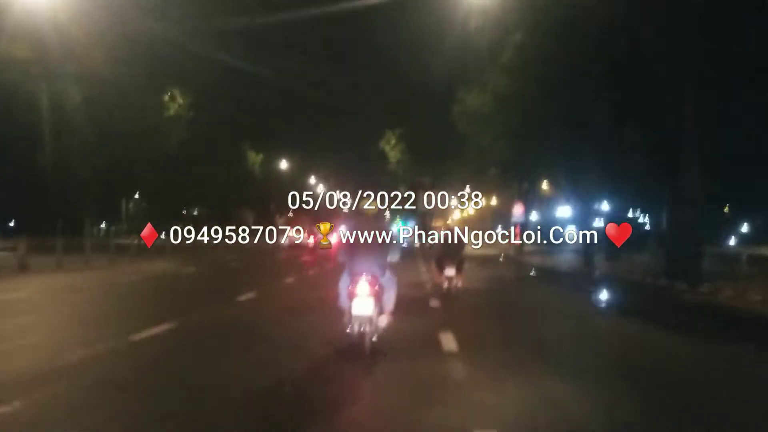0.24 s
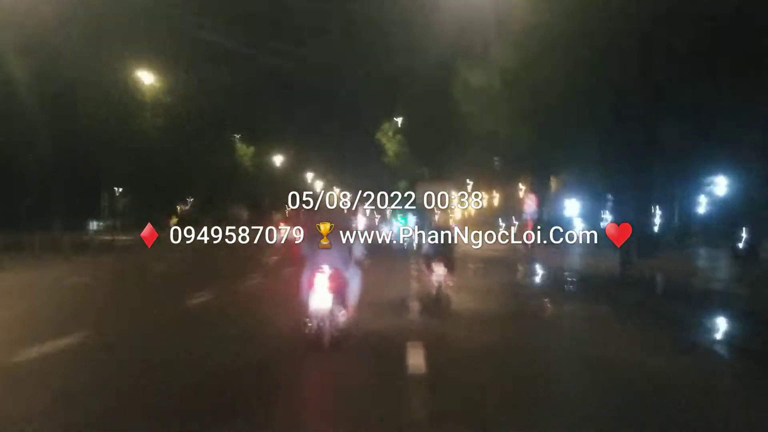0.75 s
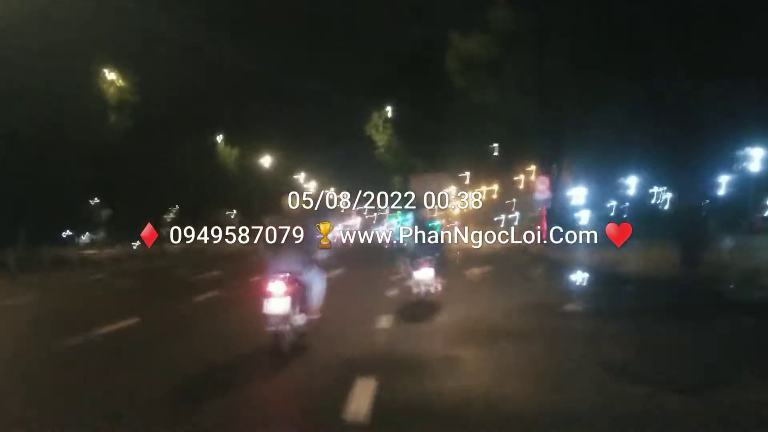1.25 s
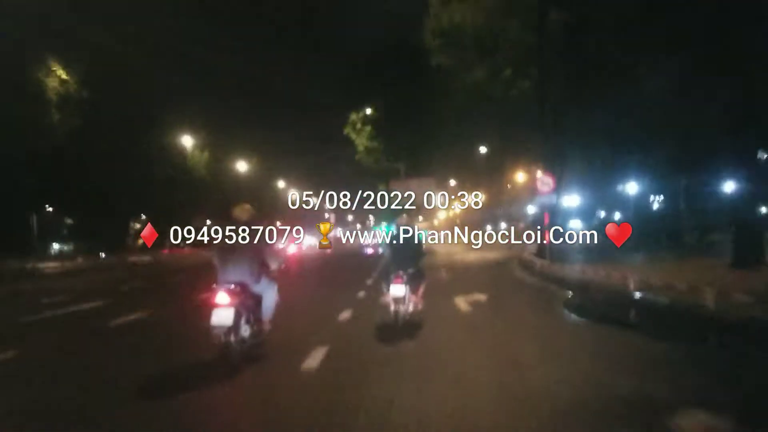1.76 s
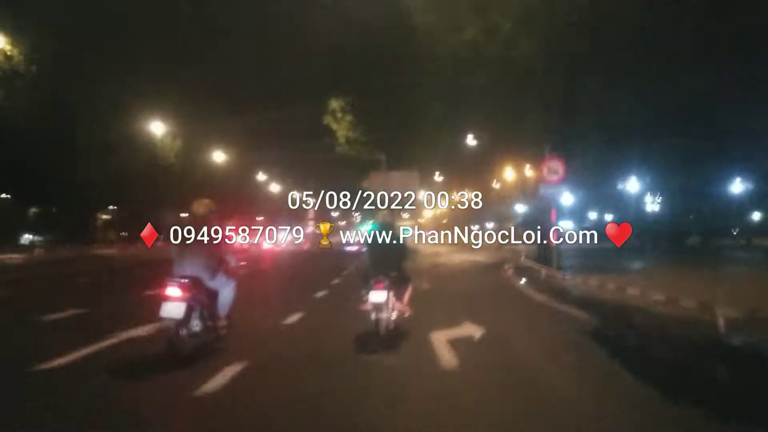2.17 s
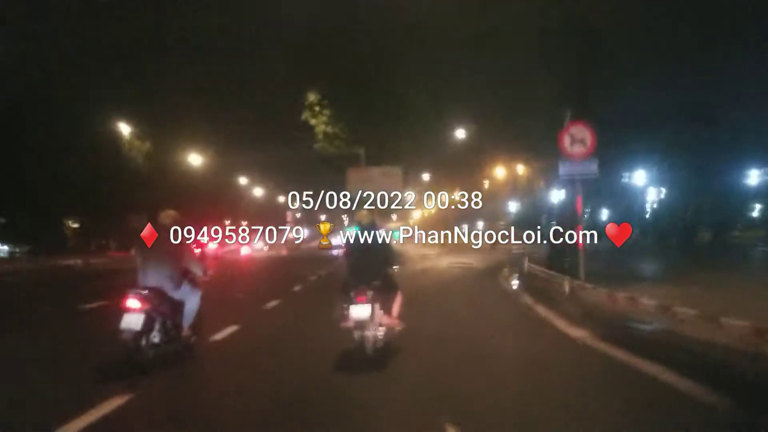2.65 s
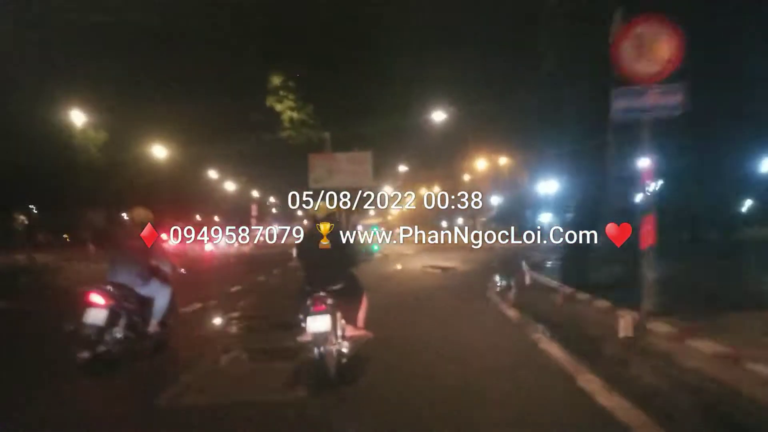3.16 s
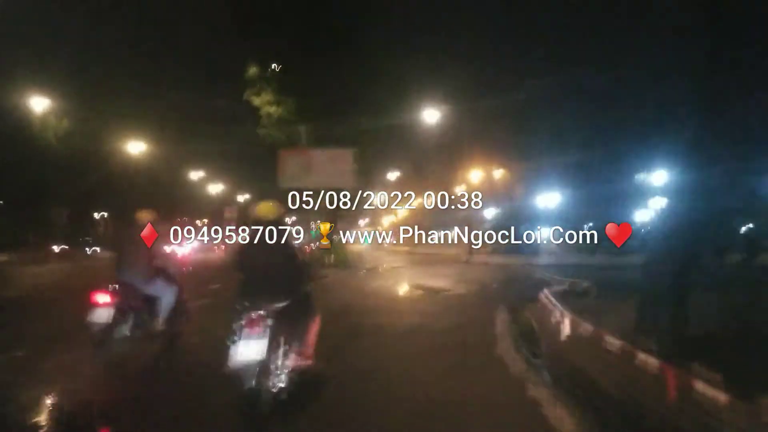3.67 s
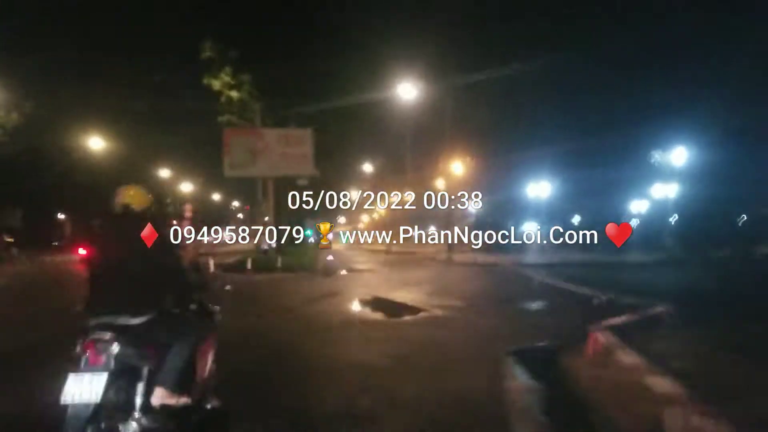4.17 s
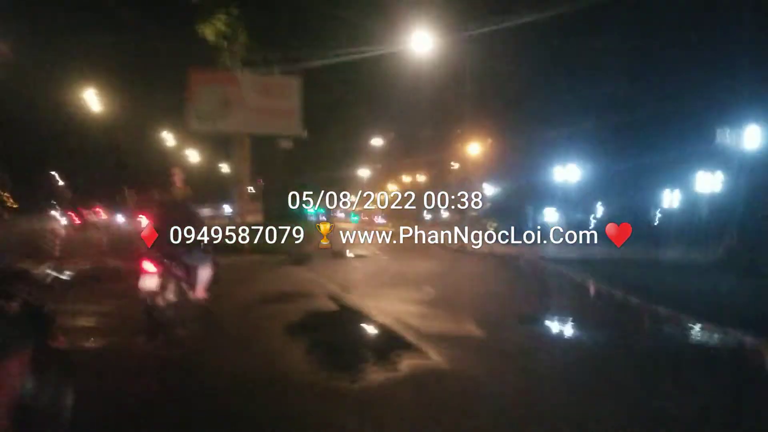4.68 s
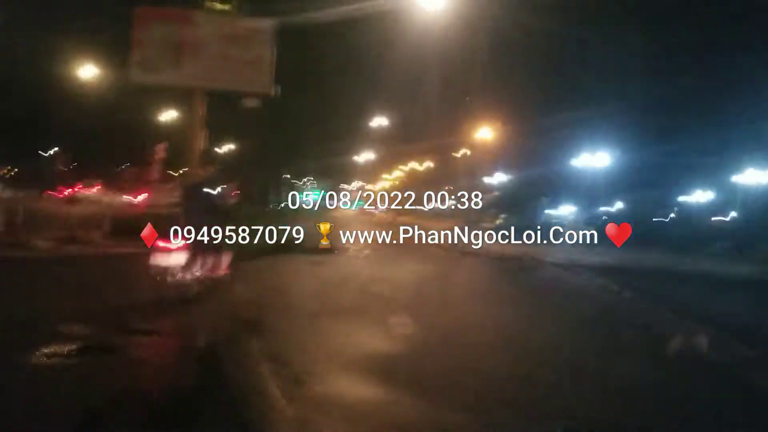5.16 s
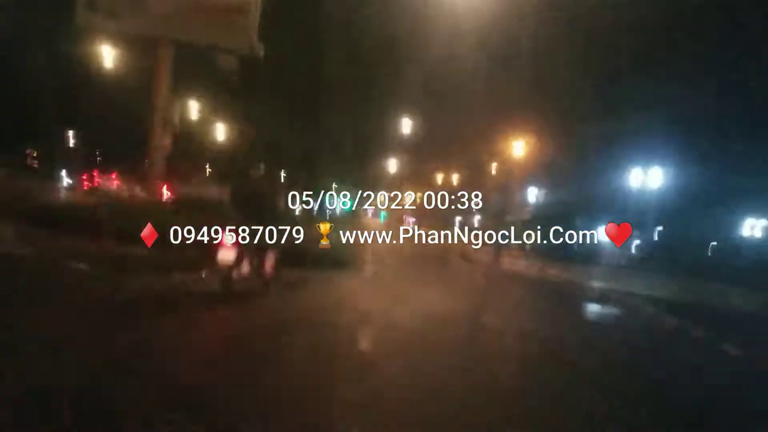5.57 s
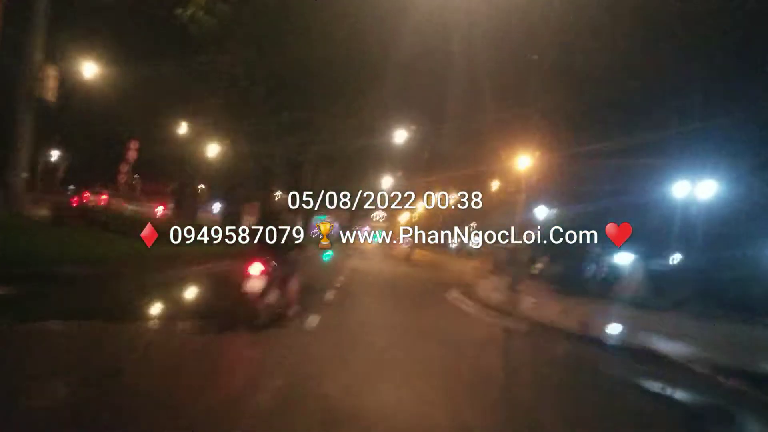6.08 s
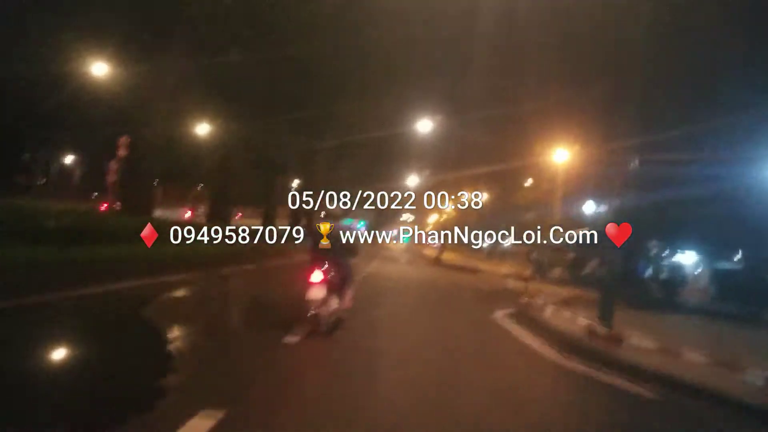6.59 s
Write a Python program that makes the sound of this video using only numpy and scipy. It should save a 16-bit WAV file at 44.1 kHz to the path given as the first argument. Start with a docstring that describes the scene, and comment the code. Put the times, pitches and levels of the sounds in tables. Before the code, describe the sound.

A small motorbike hums at a nearly constant speed throughout, heard from a microphone in a loose holder on the bike. Low wind flutters on the microphone, and the tyres rumble and softly hiss on the wet street. The plastic holder ticks rapidly from the start, with sharper, irregular knocks joining from about 1 second. The engine's drone swells and dips between roughly 1 and 3 seconds. From about 2.8 to 4.7 seconds, several bumps give dull thuds, strongest around 4 seconds, and the wind buffets more deeply from 3.5 seconds. At about 5.3 seconds the bike hits a pothole: a deep thud, a burst of hard plastic clatter and a few tiny rubber squeaks. From about 5.9 seconds the ride is noticeably quieter, with softer engine, wind and ticking, and one light bump near 6.6 seconds.

```python
"""Plastic chatter over the hum of a small motorbike, heard from a camera in a loose holder on the bike.
The single cylinder shakes the frame, wind buffets the two microphone ports, and the tyres rumble and
hiss along a wet city street at night. The holder's jaws tick and its body knocks against a stop.
At about 5.3 s the bike thuds through a pothole: the holder clacks hard, its rubber grips squeak,
and the ride goes on more quietly."""
import sys
import numpy as np
from scipy.fft import rfft, irfft, next_fast_len
from scipy.io import wavfile
from scipy.ndimage import map_coordinates

SR = 44100
rng = np.random.default_rng(int(sys.argv[2]) if len(sys.argv) > 2 else 0)


def unload_audio(sound):
    """Save the sound as a 16-bit wav file, at the path given as the first command line argument."""
    columns = np.transpose(np.atleast_2d(sound))
    # keep every value between -1 and 1, then stretch to whole-number steps
    steps = np.round(np.clip(columns, -1, 1) * 32767)
    wavfile.write(sys.argv[1], SR, steps.astype(np.int16))


N = 301203

# The bed, which drops after the pothole. Each row: time in seconds, wind in dB, road rumble in dB.
RIDE_LEVELS = [(0, -23.5, -22), (3.3, -25, -21.5), (4.2, -25, -21.5), (5.38, -22, -21), (5.9, -32.5, -28.5),
               (6.83, -31, -26.5)]
# Patches of broken asphalt. Each row: centre in seconds, half length in seconds, extra shake in dB.
ROUGH_PATCHES = [(0.593, 0.14, 0.9), (1.404, 0.2, 3), (2.416, 0.08, 1.6), (2.853, 0.076, 2),
                 (4.012, 0.086, 1.4), (4.718, 0.044, 2.9)]
# Tone of the wind, the road rumble, the tyre hiss and the spray. Each row: frequency in Hz, gain in dB.
WIND_EQ = [(15, -29), (28, -29), (45, -1), (60, -5.5), (90, -2.5), (125, -5.5), (170, -6), (260, -11),
           (500, -72)]
ROAD_EQ = [(60, -35), (110, -7), (155, -0.5), (210, -6), (280, -1.5), (345, -7.5), (410, -7), (620, -11.5),
           (1020, -10.5), (1300, -18), (1700, -26), (3000, -61), (6000, -87)]
HISS_EQ = [(900, -10), (1600, -12.5), (1950, -0.5), (2250, 2), (2500, -1.5), (2850, -3), (3200, -8),
           (3600, -13.5), (4100, -22.5), (5500, -29), (7200, -37), (8500, -56), (16000, -69)]
SPRAY_EQ = [(2500, -23), (3650, 2.5), (4200, -9), (5400, -7.5), (7200, -21.5), (8500, -33), (10800, -16),
            (16000, -22)]
# Deeper buffeting on the way to the pothole: start in seconds, end in seconds, level in dB.
LOW_GUST = (3.55, 5.3, -26.5)
# Fader for the tyre hiss. Each row: time in seconds, level in dB.
HISS_LEVELS = [(0, -42.5), (.45, -38.5), (.65, -36.5), (1.1, -37.5), (1.85, -37.5), (2.1, -37.5),
               (2.3, -33), (3.55, -36), (4.75, -33.5), (5.3, -36), (5.85, -42), (6.83, -38.5)]
# Engine speed. Each row: time in seconds, crank turns per second.
CRANK_SPEED = [(0, 68.5), (.6, 68.4), (1.7, 66.4), (2.4, 67.6), (2.8, 66.1), (3.3, 67.3), (5.2, 67.5),
               (5.9, 69), (6.83, 70.5)]
# Faders for the once-a-turn hum and the surging twice-a-turn drone. Each row: time in seconds, level in dB.
HUM_LEVELS = [(0, -28), (1.7, -33), (2.9, -30), (3.3, -33.5), (5, -26.5), (5.85, -33), (6.83, -35)]
DRONE_LEVELS = [(0, -34), (.9, -24), (1.25, -29.5), (1.45, -21.5), (1.78, -18.5), (1.88, -33),
                (2.05, -24.5), (2.21, -36.5), (2.33, -21), (2.48, -19), (2.61, -38), (2.8, -16.5),
                (3.1, -30.5), (3.6, -31.5), (4.9, -26), (5.9, -38.5), (6.83, -33.5)]
# Road bumps. Each row: start in seconds, level in dB, thud pitch in Hz, fairing boom over the thud in dB.
BUMPS = [(2.778, -17.5, 124, 0), (3.119, -7.5, 138, -8.5), (3.439, -8, 191, -11), (3.792, -12.5, 103, 1),
         (3.945, -4, 127, -14), (4.265, -3, 159, -13), (4.692, -16, 139, -19), (5.274, -1, 50.3, -6.5),
         (5.294, -5, 52, -5), (5.408, -4.5, 66, -20), (5.8, -17.5, 179, -2.5), (6.564, -16, 70, -16)]
# The camera slips in its grips. Each row: start in seconds, level in dB, centre pitch in Hz.
SQUEAKS = [(5.339, -16.5, 1360), (5.373, -20, 1030), (5.401, -22, 1200), (5.479, -22, 953),
           (5.533, -23.5, 826)]
# Loose parts jostle after the pothole: start in seconds, end in seconds, level in dB.
CLATTER = (5.33, 5.5, -32.5)
# The holder hits its stop. Each row: start in seconds, level in dB, ring pitch in Hz.
KNOCKS = [(1.092, -12, 980), (1.323, -6.5, 990), (1.336, -14, 1110), (1.377, -8.5, 834), (1.431, -9, 796),
          (1.445, -8, 835), (1.495, -12, 620), (1.551, -9.5, 554), (1.764, -17, 520), (2.015, -11, 970),
          (2.177, -17.5, 1020), (2.785, -9, 566), (2.835, -7.5, 885), (3.426, -12.5, 580),
          (3.808, -10.5, 576), (4.002, -10, 1050), (4.517, -10.5, 633), (4.606, -16.5, 880),
          (4.691, -9.5, 795), (4.884, -15.5, 511), (4.989, -22, 940), (5.324, -23, 900), (5.426, -13, 880),
          (5.453, -16, 850), (5.479, -8, 926), (5.611, -16, 930), (5.798, -13, 1030)]
# The jaws' single strikes on the camera, from hard clacks to light ticks. Each row: time in seconds, contact
# level in dB, ring pitch in Hz, ring level in dB.
JAW_STRIKES = [(.02, -30, 3650, -34), (0.079, -31.5, 2360, -29), (.137, -36, 3650, -35),
               (0.22, -34, 3630, -34), (0.245, -30.5, 5270, -40), (.279, -37, 3670, -29),
               (0.581, -36, 2800, -29), (.686, -34, 3650, -33), (.753, -37, 3650, -35),
               (0.817, -31, 3600, -34), (.92, -36, 3650, -35), (0.932, -33, 2740, -30),
               (.947, -34, 3650, -35), (1.091, -30, 3600, -30), (1.159, -42, 2780, -29),
               (1.212, -29.5, 3650, -41), (1.321, -32, 2780, -25), (1.444, -27, 3000, -32),
               (1.504, -33, 3620, -48), (1.53, -33, 3630, -38), (1.557, -26.5, 2730, -23),
               (1.582, -32, 3650, -40), (1.608, -29, 3600, -32), (1.645, -29.5, 3560, -39),
               (1.713, -35, 3620, -33.5), (1.766, -29.5, 2380, -35), (1.899, -35, 3600, -32),
               (1.948, -31.5, 2290, -30), (2.015, -28, 2270, -29), (2.068, -31.5, 2750, -39),
               (2.102, -31, 5300, -47), (2.12, -38, 3650, -33), (2.13, -35, 3650, -39),
               (2.178, -32, 2760, -30), (2.303, -30.5, 3620, -35), (2.354, -30, 3700, -29),
               (2.379, -28, 3660, -37), (2.404, -35, 3620, -30), (2.46, -30, 3650, -39),
               (2.716, -27, 2370, -25), (2.785, -40, 2300, -22), (2.835, -33.5, 2790, -25),
               (2.845, -28, 2310, -25), (2.859, -36, 3680, -38), (2.897, -34, 2280, -36),
               (2.921, -32.5, 3700, -45), (3.056, -37, 3650, -37), (3.09, -37, 3650, -40),
               (3.125, -29.5, 2250, -29), (3.147, -36, 3650, -42), (3.207, -33, 3650, -51),
               (3.246, -29, 2330, -23), (3.286, -35, 3650, -38), (3.371, -40, 3650, -44),
               (3.4, -35, 3650, -47), (3.582, -28.5, 3650, -37), (3.605, -36.5, 3650, -30),
               (3.712, -37, 3650, -32), (3.754, -34, 3680, -30), (3.831, -34, 3700, -44),
               (3.867, -29.5, 3700, -31), (3.955, -29, 3620, -33), (4.05, -35, 3650, -45),
               (4.069, -30.5, 3460, -34), (4.093, -30, 3700, -39), (4.112, -27.5, 3600, -31),
               (4.255, -36, 2310, -23), (4.269, -29, 3500, -29), (4.279, -31, 5800, -27),
               (4.515, -40, 2080, -28), (4.568, -31, 2300, -24), (4.586, -35, 6160, -32),
               (4.635, -35, 3340, -29), (4.659, -34, 3650, -44), (4.757, -27, 7060, -34),
               (4.766, -27, 2900, -22), (4.767, -35, 4800, -25), (4.841, -30.5, 3750, -43),
               (4.934, -33, 3650, -35), (4.948, -41, 6200, -35), (4.99, -31, 2290, -34),
               (5.04, -34, 3650, -42), (5.268, -35, 3650, -38), (5.293, -29, 4400, -31),
               (5.324, -24.5, 3420, -36), (5.364, -35, 2800, -31), (5.378, -21.5, 5830, -18.5),
               (5.426, -22, 2300, -12), (5.445, -43, 3670, -43), (5.479, -23, 2880, -18),
               (5.483, -25, 3420, -29), (5.523, -47, 6000, -42), (5.558, -32, 3230, -27.5),
               (5.619, -41, 2700, -24), (5.669, -38.5, 3650, -44), (5.799, -39, 2790, -30),
               (5.889, -38.5, 3700, -45), (6.15, -37, 3650, -35), (6.452, -42, 3650, -44),
               (6.574, -31, 5000, -34), (6.696, -41, 3680, -44)]
# Tone of a tick's contact. Each row: frequency in Hz, gain in dB.
TICK_EQ = [(300, -10), (1000, 34.5), (2500, 16), (3100, 6.5), (3650, 13.5), (4300, 2), (5400, 1),
           (6300, -3.5), (7100, -8), (8500, -15.5), (10800, -9), (13500, -16.5), (16000, -22.5)]
# The jaws' own thin ring, in every tick. Each row: pitch in Hz, level in dB.
JAW_MODES = [(2870, 8.5), (3620, -16.5), (5350, 1), (7100, 3)]
# The three resonances a light tick can ring, in Hz.
RATTLE_PITCHES = [2310, 2810, 3600]
# Stereo width of the noise layers. Each row: frequency in Hz, left-right correlation from -1 to 1.
PORT_LIKENESS = [(60, 0.5), (140, 0.82), (200, 0.22), (280, -0.17), (440, 0.5), (700, 0.28), (1000, 0.27),
                 (1600, -0.06), (1900, 0.77), (2400, 0.67), (3000, -0.33), (5000, 0), (15000, -0.27)]
# Each port has its own colour. Each row: frequency in Hz, left minus right in dB.
PORT_BALANCE = [(100, 0.5), (250, -1), (380, -5.5), (900, -6), (1200, -6.5), (1600, 3), (2300, -0.5),
                (2900, 6), (3600, 7.5), (4500, 1), (6000, 11), (7200, -9.5), (8300, 1), (11000, 4),
                (15000, -8)]

TIME = np.arange(N) / SR
STRIKE_S = .003  # a tick's lead-in before its strike


def amp(db):
    """Decibels to gain."""
    return 10 ** (np.asarray(db) / 20)


def along(points, hz):
    """Read (Hz, value) points on a log frequency axis."""
    freqs, values = np.transpose(points)
    return np.interp(np.log(hz + 1), np.log(freqs + 1), values)


def curves(rows):
    """Automation lanes: one value per sample for each column after the time."""
    times, *columns = np.transpose(rows)
    return [np.interp(TIME, times, column) for column in columns]


def wobble(rate):
    """A smooth random curve with rate knots a second."""
    knots = rng.standard_normal(int(N * rate / SR) + 4)
    return map_coordinates(knots, [TIME * rate])


def filtered(x, response):
    """Filter x by a gain given as a function of Hz."""
    size = x.shape[-1]
    padded = next_fast_len(size + size // 10)
    return irfft(rfft(x, padded) * response(np.fft.rfftfreq(padded, 1 / SR)), padded)[..., :size]


def stereo_noise(eq):
    """Shaped noise, partly alike at the two ports; its mid channel has rms 1."""
    def mid_side_gains(hz):
        width = np.arccos(np.clip(along(PORT_LIKENESS, hz), -1, 1)) / 2
        return amp(along(eq, hz)) * [np.cos(width), np.sin(width)]
    mid, side = filtered(rng.standard_normal((2, N)), mid_side_gains)
    return np.array([mid + side, mid - side]) / np.std(mid)


def add(track, s, sound):
    """Mix a short sound into a track at s seconds."""
    start = int(np.clip(round(s * SR), 0, N - 1))
    track[..., start:start + sound.shape[-1]] += sound[..., :N - start]


def blow(t, rise_s, decay_s):
    """Envelope of a contact: fast attack, exponential tail."""
    return (1 - np.exp(-t / rise_s)) * np.exp(-t / decay_s)


def shaking():
    """Wind and rumble levels in dB; both swell over broken asphalt, the wind more so."""
    wind_db, rumble_db = curves(RIDE_LEVELS)
    extra_db = sum(db * np.exp(-((TIME - s) / half) ** 2) for s, half, db in ROUGH_PATCHES)
    return wind_db + 1.6 * extra_db, rumble_db + extra_db


def wind(trim_db=1.5, flutter_db=0.95):
    """Air buffets the ports with a low, fluttering roar."""
    return amp(shaking()[0] + trim_db + flutter_db * wobble(22)) * stereo_noise(WIND_EQ)


def low_gust(fade_s=0.16):
    """For a while the wind thumps more deeply at the ports."""
    start, end, db = LOW_GUST
    fade = np.clip(np.minimum(TIME - start, end - TIME) / fade_s, 0, 1)
    return amp(db) * fade * stereo_noise([(20, -36), (45, 0), (75, -9), (130, -23), (300, -77)])


def road_rumble(lumps, trim_db=-1.09, lump_db=1.87):
    """Coarse asphalt shakes the frame in lumps."""
    return amp(shaking()[1] + trim_db + lump_db * lumps) * stereo_noise(ROAD_EQ)


def tyre_hiss(lumps, trim_db=-1.55, lump_db=1.97, flutter_db=0.99,
              swish_db=3.4, period_s=.444, dip_s=.345, swish_end_s=2.27):
    """Tyres hiss on the wet and flicker with the asphalt's lumps; at first they swish regularly."""
    swish = -np.tanh(2 * np.cos(2 * np.pi * (TIME - dip_s) / period_s))
    fade = np.clip((swish_end_s - TIME) / (period_s / 2) + .5, 0, 1)
    level_db = curves(HISS_LEVELS)[0] + trim_db + swish_db * swish * fade
    return amp(level_db + lump_db * lumps + flutter_db * wobble(22)) * stereo_noise(HISS_EQ)


def spray(trim_db=-39, grain_db=1.5):
    """Water flung off the tyres: a fine, grainy sizzle that follows the ride's level."""
    return amp(curves(RIDE_LEVELS)[1] + trim_db + grain_db * wobble(500)) * stereo_noise(SPRAY_EQ)


def engine(hum_trim_db=1.5, drone_trim_db=0.5, puff_db=-10):
    """The crank shakes the frame once and twice a turn; every second turn fires an exhaust puff."""
    (speed,), (hum_db,), (drone_db,) = curves(CRANK_SPEED), curves(HUM_LEVELS), curves(DRONE_LEVELS)
    turns = np.cumsum(speed * (1 + .004 * wobble(14))) / SR
    drone = amp(drone_db + drone_trim_db + 1.1 * wobble(33)) * np.sin(4 * np.pi * turns)
    hum = amp(hum_db + hum_trim_db + wobble(7.7)) * np.sin(2 * np.pi * turns)
    firing = np.exp(-3.5 * (turns / 2 % 1)) * rng.standard_normal(N)
    muffler_eq = [(60, -48), (150, -11), (400, -7), (1000, -32.5), (2500, -28), (6000, -79)]
    puffs = filtered(firing, lambda hz: amp(along(muffler_eq, hz)))
    puffs /= np.sqrt(np.mean(puffs ** 2))
    exhaust = amp(shaking()[1] + puff_db) * puffs  # rides the rumble's fader
    return np.sqrt(2) * (hum + drone) + exhaust


def bumps(trim_db=-3, rise_s=0.0073, boom_hz=262):
    """Each bump swings the frame for a few cycles; the fairing booms above it."""
    out, t = np.zeros(N), np.arange(SR // 8) / SR
    swell = t / rise_s * np.exp(1 - t / rise_s)
    for s, db, hz, boom_db in BUMPS:
        detune, phase = rng.standard_normal(2)
        thud = np.sin(2 * np.pi * hz * t)
        boom = amp(boom_db) * np.sin(2 * np.pi * (boom_hz * np.exp(0.014 * detune) * t + phase))
        add(out, s, amp(db + trim_db) * swell * (thud + boom))
    return out


def squeaks(length_s=0.013, sag=0.071, roughness=0.81):
    """Rubber slips for a moment: a short, rough tone that sags in pitch."""
    out, progress = np.zeros(N), np.arange(int(length_s * SR)) / (length_s * SR)
    envelope = np.sin(np.pi * np.sqrt(progress))
    for s, db, hz in SQUEAKS:
        pitch = hz * (1 + sag * (.5 - progress))
        add(out, s, amp(db) * envelope * np.sin(2 * np.pi * np.cumsum(pitch) / SR))
    return out * (1 + roughness * wobble(490))


def tick(low_cut_hz, bounce_db, tilt_db_per_octave=0, pivot_hz=5500,
         rise_s=0.00059, decay_s=0.00084, ring_s=.0011, lag_samples=24):
    """One crisp contact: a soft touch, the strike with the jaws' thin ring, then a bounce."""
    def colour(hz):
        tilt_db = tilt_db_per_octave * np.log2((hz + 1) / pivot_hz)
        # little sounds below the lowest resonance that the contact reaches
        low_cut = hz ** 2 / (hz ** 2 + (0.96 * low_cut_hz) ** 2)
        return amp(along(TICK_EQ, hz) + tilt_db) * low_cut
    t = np.arange(SR // 40) / SR
    since_strike = np.maximum(t - STRIKE_S, 0)
    since_bounce = np.maximum(since_strike - rng.uniform(0.00566, 0.01164), 0)
    touch = amp(-11) * (t / STRIKE_S) ** 2 * (t < STRIKE_S)
    bounce = amp(bounce_db + rng.uniform(-6, 4)) * blow(since_bounce, rise_s, decay_s)
    force = touch + blow(since_strike, rise_s, decay_s) + bounce
    # each port hears a common contact plus its own path through the shell; the left hears it later
    grit = rng.standard_normal(len(t)) + 1.69 * rng.standard_normal((2, len(t)))
    ring = sum(amp(db - 13) * rng.standard_normal((2, 1)) * np.sin(2 * np.pi * hz * since_strike)
               for hz, db in JAW_MODES)
    left, right = filtered(force * grit, colour) + ring * blow(since_strike, rise_s, ring_s)
    return np.array([np.roll(left, lag_samples), right])


def shell_ring(hz, rise_s=0.00019, decay_cycles=5.5, spacing=0.18):
    """Three close modes of the thin shell, varied per port; they die in a few cycles, so high ones click."""
    t = np.arange(SR // 60) / SR
    mode_hz = hz * np.exp(spacing * np.array([[-1], [0], [1]]) + 0.025 * rng.standard_normal((2, 3, 1)))
    modes = np.sin(2 * np.pi * (mode_hz * t + 0.13 * rng.standard_normal((2, 3, 1))))
    return blow(t, rise_s, decay_cycles / hz) * (modes * [[.4], [1], [.4]]).sum(axis=1)


def rattle(per_s=17.1, jitter=0.18, tick_db=-30.5, ring_db=-28, scatter_db=2.6):
    """The holder rocks at its own loose rate, ticking lightly, harder where the road shakes more."""
    out, rumble_db = np.zeros((2, N)), shaking()[1]
    shake_db = rumble_db - np.median(rumble_db) + 0.5 * wobble(4.83)
    for k, (late, size, pick) in enumerate(rng.standard_normal((int(per_s * N / SR), 3))):
        s = np.clip((k + .5 + jitter * late) / per_s, 0, (N - 1) / SR)
        db = shake_db[int(s * SR)] + scatter_db * min(size, 1)
        hz = RATTLE_PITCHES[int(np.digitize(pick, [-.5, .5]))]
        add(out, s - STRIKE_S, amp(db + tick_db) * tick(hz, bounce_db=-5))
        add(out, s, amp(db + ring_db) * shell_ring(hz))
    return out


def clatter(count=30, hz=1350, pitch_scatter=0.36, tick_db=-15, scatter_db=8):
    """Loose plastic parts jostle: a dense run of knocks at scattered pitches, each with a bright tick."""
    start, end, db = CLATTER
    out = np.zeros((2, N))
    for when, (pitch, size) in zip(np.linspace(start, end, count), rng.standard_normal((count, 2))):
        s = when + rng.uniform(-.003, .003)
        add(out, s, amp(db) * shell_ring(hz * np.exp(pitch_scatter * pitch)))
        add(out, s, amp(db + tick_db + scatter_db * size) * tick(hz, bounce_db=-6))
    return out


def knocks(ring_db=-3, scuff_db=-4.5):
    """The holder's damped plastic hits its stop: a brief ring inside a dull scuff of noise."""
    ring, hits, t = np.zeros((2, N)), np.zeros(N), np.arange(SR // 20) / SR
    for s, db, hz in KNOCKS:
        hit = amp(db) * blow(t, rise_s=0.00031, decay_s=0.0035)
        add(ring, s, hit * np.sin(2 * np.pi * hz * t + rng.normal(0, 1, (2, 1))))
        add(hits, s, hit)
    scuff_eq = [(150, -29), (450, -9), (1000, 8), (1700, -11), (2600, -13.5), (4500, -26), (9000, -51)]
    return amp(ring_db) * ring + amp(scuff_db) * hits * stereo_noise(scuff_eq)


def chatter(tick_trim_db=10, ring_trim_db=7, hard_db=-29.5, small_count=300, small_db=-21):
    """The jaws strike the camera and ring; the rougher the road, the louder the small ticks between."""
    out = np.zeros((2, N))
    for s, db, hz, ring_db in JAW_STRIKES:
        tilt = 0.65 * max(db - hard_db, 0)  # hard strikes are brighter
        bounce_db = min(-43 - db, -5)  # the bounce is about as loud after hard and soft strikes
        add(out, s - STRIKE_S, amp(db + tick_trim_db) * tick(hz, bounce_db, tilt))
        add(out, s, amp(ring_db + ring_trim_db) * shell_ring(hz))
    shake_db = shaking()[1] + small_db
    for sample, size in zip(rng.integers(0, N, small_count), rng.standard_normal(small_count)):
        db = shake_db[sample] + 4 * min(size, 1.5)
        add(out, sample / SR, amp(db) * tick(low_cut_hz=1400, bounce_db=-2))
    return out


def scene():
    """Mix the ride and the holder, then give each port its own colour."""
    def port_gains(hz):
        gains = amp(np.outer([1, -1], along(PORT_BALANCE, hz)) / 2)
        return gains / np.sqrt(np.mean(gains ** 2, axis=0))
    ride = engine() + wind()
    lumps = wobble(70)  # the asphalt's texture, shared by rumble and hiss
    ride += road_rumble(lumps) + tyre_hiss(lumps) + spray() + low_gust() + bumps()
    holder = knocks() + squeaks() + clatter() + chatter() + rattle()
    return filtered(ride + holder, port_gains)


def record(dry):
    """The camera rounds off the highest peaks and keeps nothing above 16 kHz."""
    rounded = dry / (1 + np.abs(dry) ** 8) ** (1 / 8)
    return filtered(rounded, lambda hz: hz < 16000)


dry = scene()
out = record(dry)
unload_audio(out)
```